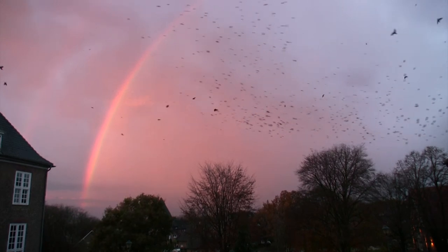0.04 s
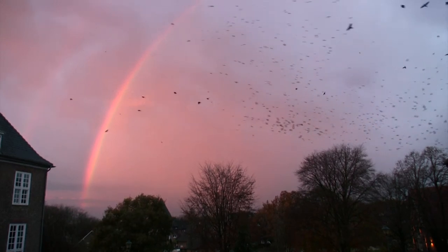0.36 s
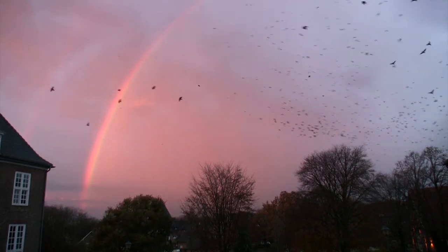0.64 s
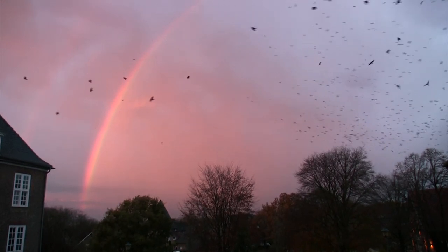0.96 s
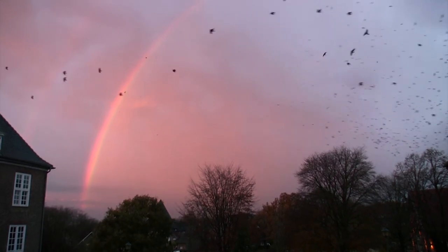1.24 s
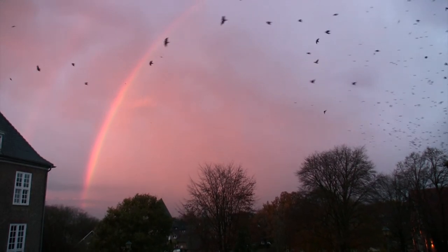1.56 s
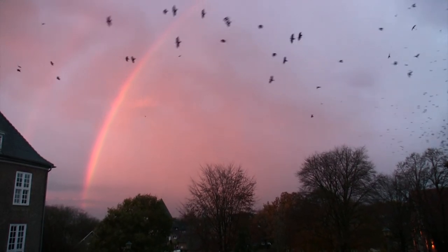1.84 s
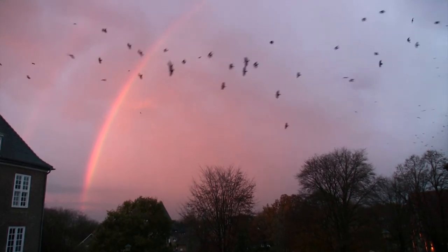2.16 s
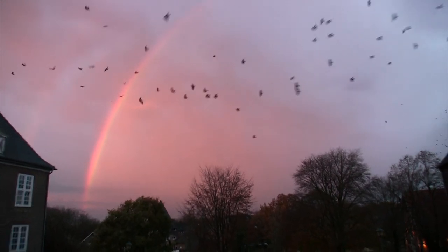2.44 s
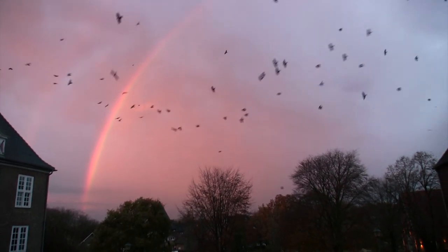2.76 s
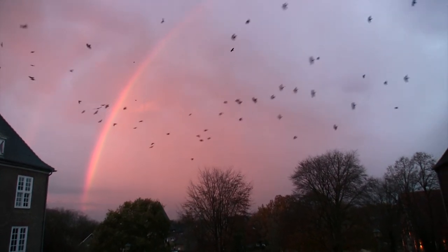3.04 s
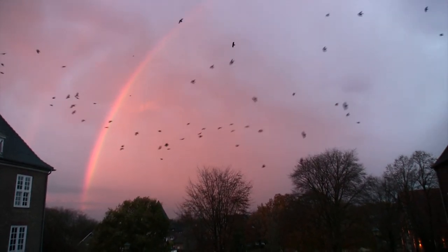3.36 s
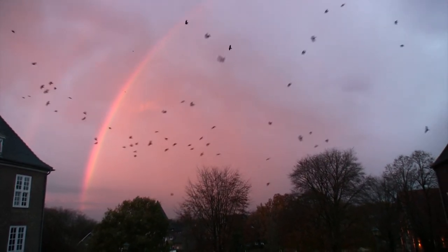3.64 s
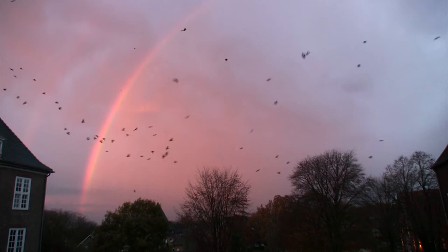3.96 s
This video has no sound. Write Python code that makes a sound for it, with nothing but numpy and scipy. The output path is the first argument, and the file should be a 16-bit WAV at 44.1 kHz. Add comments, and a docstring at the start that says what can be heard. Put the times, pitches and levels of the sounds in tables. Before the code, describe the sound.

A large flock of jackdaws chatters outdoors throughout the four seconds. Close birds give short, sharp, falling calls, some hoarse, echoing lightly off houses and trees. Behind them, dense distant chatter thins after about 2 seconds as the flock drifts slightly right. A faint low rumble lies underneath, with very faint thin whistles early on and two small, hollow knocks nearby at about 1.6 and 3.8 seconds.

```python
"""Jackdaws chatter over gardens at dawn, a big flock passing a stereo microphone, a little to its right.
Birds close overhead give short falling "tchak" calls: harmonics shaped by throat and beak, clear at
first, then hoarse. Hundreds farther off merge into a chatter that thins as they pass. Houses and trees
throw the calls back. Underneath lie a low outdoor rumble, faint thin whistles and two small knocks
close by."""
import sys
import numpy as np
from scipy import signal
from scipy.fft import rfft, irfft
from scipy.io import wavfile

SR = 44100
rng = np.random.default_rng(int(sys.argv[2]) if len(sys.argv) > 2 else 0)


def inscribe(sig):
    """Save sig as 16-bit PCM at rate SR to the path in sys.argv[1].

    A 1-D sig is mono; a 2-D sig holds one channel per row.
    Samples are clipped to [-1, 1] before scaling.
    """
    pcm = np.round(np.clip(np.atleast_2d(sig).T, -1, 1) * 32767)
    wavfile.write(sys.argv[1], SR, pcm.astype(np.int16))


N = 176400
TREBLE_FROM_HZ = 4100   # treble boosts of voice and rasp act above this


def from_db(db):
    """Decibels to gain."""
    return 10 ** (np.asarray(db) / 20)


def rms_one(x):
    """Scale to rms 1."""
    return x / np.sqrt(np.mean(x ** 2) + 1e-20)


def in_time(rows):
    """Read rows of seconds and value at every sample."""
    return np.interp(np.arange(N) / SR, *np.transpose(rows))


def at_hz(points, hz):
    """Read rows of Hz and value on a log-frequency axis."""
    freqs, values = np.transpose(points)
    return np.interp(np.log(hz + 1e-9), np.log(freqs), values)


def add(out, start_s, sound, pan_db=0):
    """Mix a sound into both channels; a positive pan moves it left."""
    i = int(start_s * SR)
    a, b = max(i, 0), min(i + sound.shape[-1], N)
    if b > a:
        out[:, a:b] += from_db([[pan_db], [-pan_db]]) * sound[..., a - i:b - i]


def stereo_noise(likeness, size, spectrum=None):
    """Two channels of noise, alike to a degree that depends on frequency."""
    mid, side = rfft(rng.standard_normal((2, size)))
    hz = np.arange(len(mid)) * SR / size
    alike = np.clip(at_hz(likeness, hz), -1, 1)
    colour = 1 if spectrum is None else from_db(at_hz(spectrum, hz))
    left_right = np.sqrt(1 + alike) * mid + np.sqrt(1 - alike) * side * [[1], [-1]]
    return rms_one(irfft(colour * left_right, size))


def rasp(throat, treble_db=6):
    """Turbulent air through the throat resonances, brighter than the voice."""
    # Each row: frequency in Hz, left-right likeness of the rasp.
    likeness = [(2500, 0.95), (5000, 0.59), (8000, -0.19)]
    return stereo_noise(likeness, N, [(hz, db + treble_db * (hz > TREBLE_FROM_HZ)) for hz, db in throat])


def call(throat, hiss, length, start_hz, end_hz, level_db, treble_db, rough):
    """One call: harmonics slide down through the throat, grow hoarse and break up into a rasp."""
    attack_s, release_s, hiss_release_s = 0.0073, 0.013, 0.073   # a release spans two time constants
    jitter_depth, jitter_hz, flutter_depth, scatter_rad = 0.0905, 601.8, 0.73, 1.2
    sag_db, overtone_spread_db, top_hz = 3, 4, 12500
    t = np.arange(int((length + 2 * hiss_release_s) * SR)) / SR
    *wobbles, overtone_draws = rng.standard_normal(size=(3, 512))
    offset = int(rng.random() * N / 2)
    progress = np.minimum(t / length, 1)
    hoarse = rough * (0.31 + progress)
    envelope = from_db(level_db - sag_db * progress) * np.minimum(t / attack_s, 1)
    hiss_release = np.exp(-2 * np.maximum(t - length, 0) / hiss_release_s)
    out = from_db(1 + treble_db / 2) * hoarse * hiss_release * hiss[:, offset:offset + len(t)]

    voiced = t < length + 2 * release_s   # the voice stops before the rasp does
    t, hoarse = t[voiced], hoarse[voiced]
    jitter, flutter = (np.interp(t * jitter_hz, np.arange(len(w)), w) for w in wobbles)
    glide = np.minimum((t / length) ** 1.5, 1.4)
    pitch = start_hz * (end_hz / start_hz) ** glide
    phase = 2 * np.pi * np.cumsum(pitch * (1 + jitter_depth * hoarse * jitter)) / SR
    scatter = scatter_rad * hoarse * flutter   # overtones blur first as the voice turns hoarse
    harmonics = range(1, int(top_hz / start_hz) + 1)
    throat_gains = from_db(at_hz(throat, np.outer(harmonics, pitch[::32])))
    voice = 0
    for k in harmonics:
        # Each bird has its own strong and weak overtones.
        own_db = overtone_spread_db * min(overtone_draws[k], 1) * (k > 2)
        boost_db = treble_db * (k * start_hz > TREBLE_FROM_HZ)
        gain = np.repeat(throat_gains[k - 1] * from_db(own_db + boost_db), 32)[:len(t)]
        blur = np.clip((k - 2) / 2, 0, 2) * np.roll(scatter, 331 * k)
        voice += gain * np.sin(k * phase + blur)
    release = np.exp(-2 * np.maximum(t - length + release_s / 2, 0) / release_s)
    out[:, :len(t)] += voice * release * (1 + flutter_depth * hoarse * flutter) / np.sqrt(1 + hoarse ** 2)
    return envelope * out


def flock(count=200):
    """Many birds far from the microphone, each with its own pitch, length, strength and direction."""
    # Throat and beak as heard from a distance. Each row: frequency in Hz, gain in dB.
    far_throat = [(600, -15.5), (850, -10), (1150, 0), (1700, 4.5), (2400, 0.5), (2720, -4.5), (3050, -12),
                  (4000, -14.5), (5400, -14.5), (7000, -22.5), (9000, -20), (11000, -35.5), (13500, -49)]
    # The chatter thins as the flock passes. Each row: time in seconds, relative level in dB.
    chatter_level = [(0.0, -13.5), (0.13, -20.5), (0.42, -17), (0.64, -20.5), (0.72, -21.5), (0.82, -20),
                     (1.04, -17.5), (1.17, -22.5), (1.27, -16.5), (1.69, -21), (1.78, -21.5), (1.98, -18),
                     (2.15, -21.5), (2.33, -29), (2.56, -21), (2.68, -32.5), (2.86, -27), (3.61, -33),
                     (4.0, -29)]
    typical_hz, typical_s, fall_ratio = 1168.3, .04, .75
    out, hiss = np.zeros((2, N)), rasp(far_throat)
    draws = rng.standard_normal(size=(count, 7))
    for i, (when, pitch, length, fall, loud, side, bright) in enumerate(draws):
        start_s = (i + when) / count * (N / SR + typical_s) - typical_s
        start_hz = typical_hz * np.exp(.13 * pitch)
        end_hz = start_hz * fall_ratio * np.exp(0.0808 * fall)
        sound = call(far_throat, hiss, typical_s * np.exp(.3 * length), start_hz, end_hz,
                     level_db=3 * min(loud, 1.5), treble_db=3 * bright, rough=.45)
        add(out, start_s, sound, pan_db=0.5 * side)
    return rms_one(out) * from_db(in_time(chatter_level) - 4.5)


def air():
    """The gardens' background: a low rumble in the centre and a faint, wide hiss."""
    # Each row: frequency in Hz, relative noise density in dB.
    spectrum = [(25, -40), (45, -16.5), (90, -5), (145, 0), (200, -3), (260, -11.5), (370, -5.5),
                (520, -8.5), (800, -11), (2400, -7.5), (3100, -20), (5500, -22.5), (9000, -31),
                (11000, -39), (13000, -44), (15500, -81)]
    # Each row: time in seconds, level in dB.
    level = [(0, -30), (1.5, -29.5), (2.4, -27.5), (3.2, -28.5), (4, -27)]
    # Each row: frequency in Hz, left-right likeness.
    likeness = [(100, 0.99), (600, .92), (2500, 0.77), (5000, 0.34), (9000, 0.041)]
    return from_db(in_time(level)) * stereo_noise(likeness, N, spectrum)


def near_birds(wall_db=-11.5, wall_delay_s=(0.0052, .028)):
    """Birds close overhead: each "tchak" comes back off a house wall; one caw and one squeak join in."""
    # The "tchak" calls. Each row: start in seconds, length in seconds, start and end pitch in Hz,
    # relative level in dB, treble boost in dB, roughness from 0 to 1.
    tchaks = [ (.040, .034, 1403, 1135, -13.5, 0.5, .35), (0.088, 0.03, 1345, 1245, -20.5, 8.5, 0.54),
              (.29, 0.019, 1147, 1015, -18, -2, 0.4), (.335, 0.061, 1254, 1046, -20.5, 0, 0.94),
              (.445, 0.038, 1310, 1143, -20.5, -2, 0.5), (.559, 0.024, 1157, 909, -15, -4, 0.26),
              (.578, 0.021, 1316, 987, -14.5, 4, 0.38), (.6, 0.043, 811, 752, -23, -1, 0.34),
              (0.637, 0.034, 1323, 1133, -24.5, 12.5, 0.44), (.96, 0.075, 884, 771, -24, 5, 0.4),
              (1.039, 0.034, 1445, 1107, -14.5, 1.5, 0.27), (1.079, .02, 1363, 1200, -13.5, -7, 0.1),
              (1.195, 0.033, 1196, 986, -20, -6, 0.73), (1.24, 0.029, 1415, 1280, -16, 3, 0.52),
              (1.26, 0.027, 1427, 1268, -12.5, -4, 0.2), (1.28, 0.022, 1345, 1063, -22, 4, .22),
              (1.374, 0.021, 1310, 1068, -15, -4, 0.12), (1.4, 0.041, 1474, 1240, -35.5, 12, 0.6),
              (1.44, 0.048, 1407, 1223, -21, -3, 0.84), (1.548, 0.021, 1224, 1092, -15, -5.5, 0.24),
              (1.705, 0.027, 1380, 1180, -17.5, -4.5, 0.3), (1.726, 0.041, 1297, 1135, -16, 4, .55),
              (1.772, 0.037, 1366, 1146, -19.5, -2, 0.37), (1.812, 0.018, 1422, 1367, -12, 0, 0.2),
              (1.821, 0.022, 1172, 942, -13, -1, 0.2), (1.87, 0.043, 1306, 1124, -22, 7.5, 0.52),
              (1.922, 0.032, 946, 850, -27, 9, 0.25), (1.935, 0.038, 1480, 1297, -32.5, 14, 0.17),
              (2.006, 0.03, 1266, 1094, -24.5, 9.5, .3), (2.07, 0.056, 1282, 1096, -28.5, 17, 0.73),
              (2.125, 0.033, 1101, 826, -23, 3, .55), (2.169, 0.023, 914, 803, -28, 3, 0),
              (2.236, 0.018, 990, 910, -22.5, -16, 0), (2.282, 0.017, 1500, 1310, -23, 6.5, 0.2),
              (2.367, 0.019, 1248, 1013, -12.5, -2, .15), (2.393, 0.016, 1220, 930, -31, 11, 0),
              (2.444, 0.033, 1385, 1200, -13.5, 4, 0.08), (2.474, 0.043, 879, 796, -25, 0, .55),
              (2.51, 0.0327, 1315, 1130, -17, -5, .3), (2.55, 0.045, 1386, 1150, -25, 3, 0.79),
              (2.697, 0.034, 1434, 1244, -23.5, 4, 0.63), (2.734, 0.028, 1393, 1236, -19.5, 0.5, 0.45),
              (2.771, 0.024, 1284, 1040, -20, -2, .3), (2.875, 0.062, 1210, 947, -24, -1, .6),
              (2.943, 0.028, 1420, 1192, -13, -2.5, 0.15), (2.965, .022, 900, 724, -25.5, 8, 0.8),
              (2.98, 0.015, 1334, 1276, -14.5, -17, 0.07), (2.997, 0.027, 1323, 1070, -15, -15, 0.12),
              (3.008, 0.051, 873, 666, -28.5, -10, 0.06), (3.02, .042, 1368, 1094, -19.5, -3, 0.28),
              (3.048, 0.034, 1160, 1060, -22.5, 1.5, 0.22), (3.14, 0.024, 1335, 1080, -39.5, 17.5, 0.57),
              (3.255, .022, 1277, 1080, -12, 2.5, 0.25), (3.274, 0.029, 1148, 857, -27, 10, 0.8),
              (3.310, 0.043, 975, 795, -28, -9, 0.33), (3.437, .04, 1359, 1128, -24, -3, .55),
              (3.678, 0.051, 1290, 1042, -19.5, -4, 0.83)]
    # A drawn-out, nearly level caw and a pinched squeak: one such row each.
    caw = (.11, .11, 575, 562, -25, 0, .15)
    squeak = (.520, .038, 1375, 1270, -15, 0, .06)
    # Resonances of throat and beak for the three kinds of call. Each row: frequency in Hz, gain in dB.
    tchak_throat = [(600, -18.5), (900, -19), (1150, -11), (1400, -6), (1650, 5), (2350, 2), (2750, 0),
                    (3050, -12), (3600, -16.5), (4050, -14.5), (4450, -15), (5400, -12.5), (7000, -19.5),
                    (9000, -22), (11000, -37), (13500, -57.5)]
    caw_throat = [(560, -20), (1690, 3), (2260, -12), (2850, -5), (12000, -50)]
    squeak_throat = [(1300, -18), (2650, -6), (3200, -8), (3800, 0), (4150, 0), (5300, -25), (6700, -19),
                     (8000, -14), (9200, -17), (11000, -36), (13500, -52)]
    out, hiss = np.zeros((2, N)), rasp(tchak_throat)
    for start_s, *shape in tchaks:
        sound = call(tchak_throat, hiss, *shape)
        add(out, start_s, sound)
        add(out, start_s + rng.uniform(*wall_delay_s), from_db(wall_db) * sound)
    add(out, caw[0], call(caw_throat, hiss, *caw[1:]))
    add(out, squeak[0], call(squeak_throat, hiss, *squeak[1:]))
    return from_db(-1.5) * out


def echoes(x, t60_s=0.89, build_s=0.037, cutoff_hz=3600):
    """Scatter from the walls and trees around the microphone: a late, dull, dying tail."""
    # Each row: frequency in Hz, left-right likeness of the tail.
    likeness = [(1000, 0.93), (2500, 0.72), (5000, 0.64), (8000, 0.045)]
    t = np.arange(SR) / SR
    tail = stereo_noise(likeness, size=SR) * from_db(-60 * t / t60_s) * np.minimum(t / build_s, 1) ** 2
    lowpass = signal.butter(1, cutoff_hz, fs=SR, output="sos")
    tail = signal.sosfilt(lowpass, rms_one(tail) / np.sqrt(SR))
    return signal.fftconvolve(x, tail, axes=1)[:, :N]


def whistles():
    """Faint steady whistles, each a sine with its octave."""
    # Each row: start in seconds, length in seconds, pitch in Hz, level in dB, octave's relative dB.
    notes = [(.47, .2, 4503, -48, 1), (.70, .22, 4503, -46, 1), (2.63, .09, 3100, -40, -25)]
    out = np.zeros((2, N))
    for start_s, length, hz, db, octave_db in notes:
        phase = 2 * np.pi * hz * np.arange(int(length * SR)) / SR
        tone = np.sin(phase) + from_db(octave_db) * np.sin(2 * phase)
        add(out, start_s, from_db(db) * signal.windows.tukey(len(phase), .5) * tone)
    return out


def knocks():
    """Two small hollow knocks beside the microphone, each ringing briefly in four modes."""
    # Each row: start in seconds, level in dB, factor on the mode frequencies.
    hits = [(1.615, -23.5, 0.8), (3.839, -18.5, 0.946)]
    # Each row: base frequency in Hz, relative level in dB, seconds to fall by 60 dB.
    modes = [(965, 7, 0.018), (1118, 9, .028), (4670, 7, 0.0049), (9000, 0, 0.0032)]
    out, t = np.zeros((2, N)), np.arange(SR // 10) / SR
    for start_s, db, factor in hits:
        ring = sum((-1) ** k * from_db(db + mode_db - 60 * t / t60) * np.sin(2 * np.pi * hz * factor * t)
                   for k, (hz, mode_db, t60) in enumerate(modes))
        add(out, start_s, ring)
    return out


def scene():
    """Birds and their echoes over the background; the far ones echo more."""
    # The birds drift to the right of the microphone. Each row: time in seconds, left minus right in dB.
    direction = [(0, -0.8), (1.5, -1.5), (2.8, -2.5), (4, -3)]
    near, far = near_birds(), flock()
    birds = near + far + echoes(from_db(-12.5) * near + from_db(-3) * far)
    pan = from_db(in_time(direction) * [[.5], [-.5]])
    return birds * pan + air() + knocks() + whistles()


def record(dry, stop_hz=15700):
    """A steep low-pass cuts the highest treble."""
    return signal.sosfilt(signal.cheby2(12, 70, stop_hz, fs=SR, output="sos"), dry)


dry = scene()
out = record(dry)
inscribe(out)
```